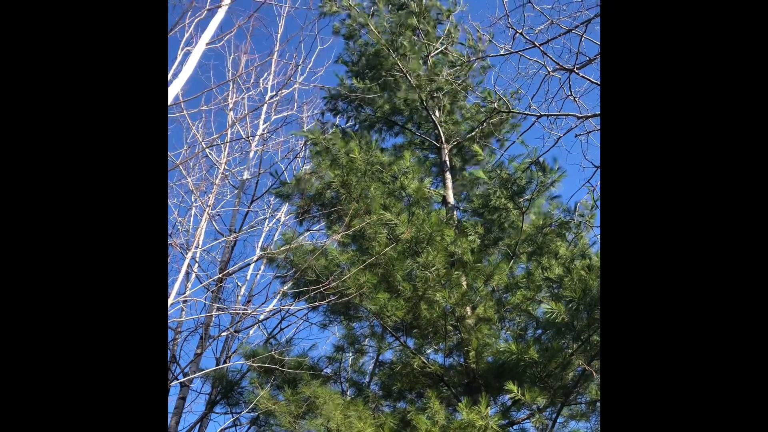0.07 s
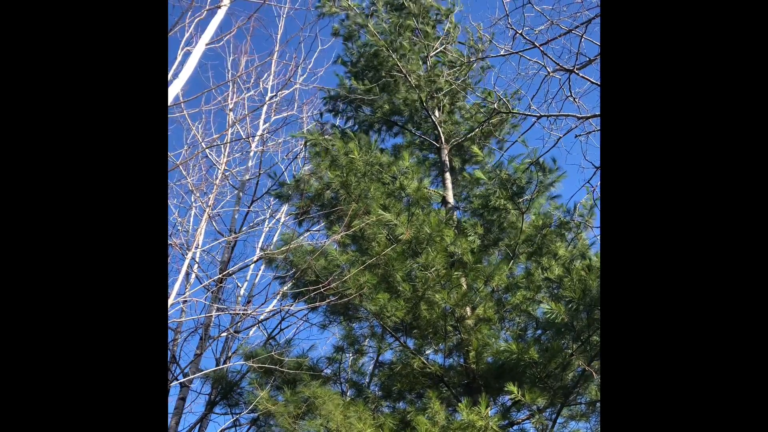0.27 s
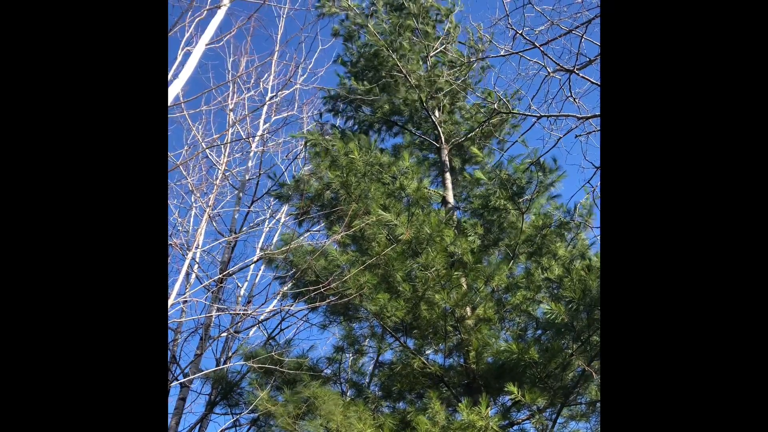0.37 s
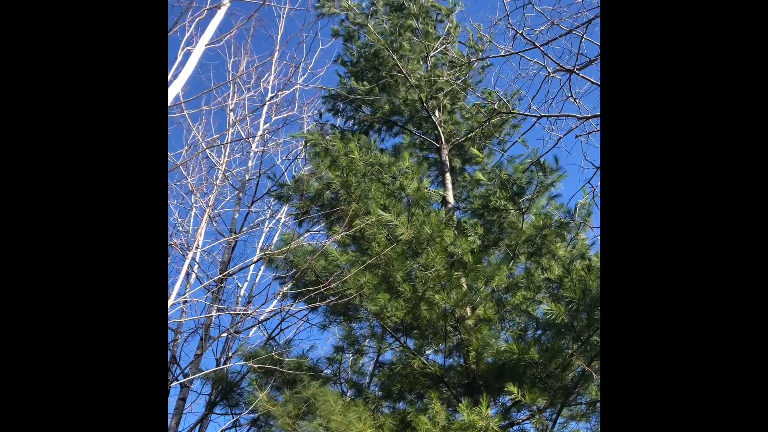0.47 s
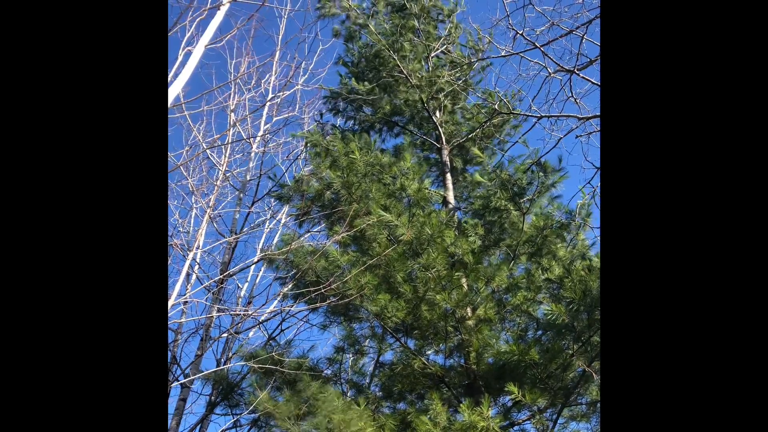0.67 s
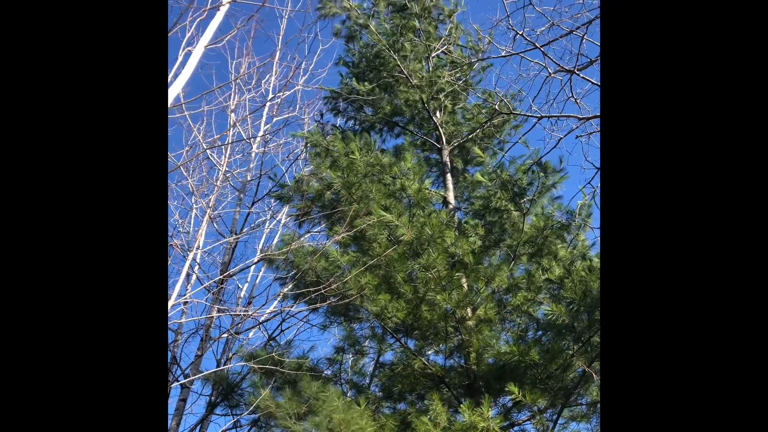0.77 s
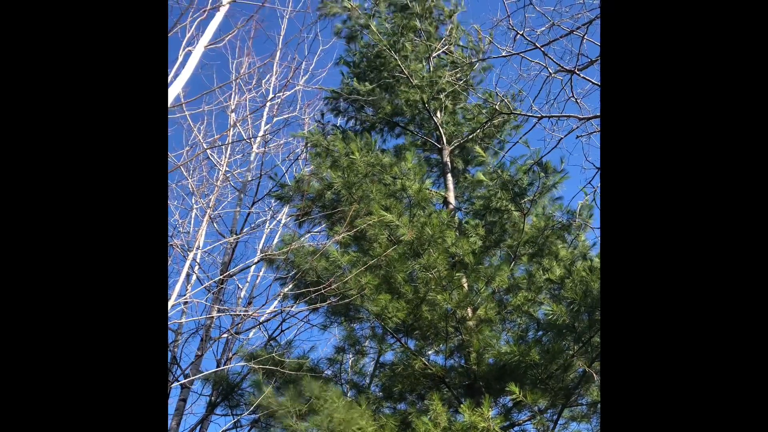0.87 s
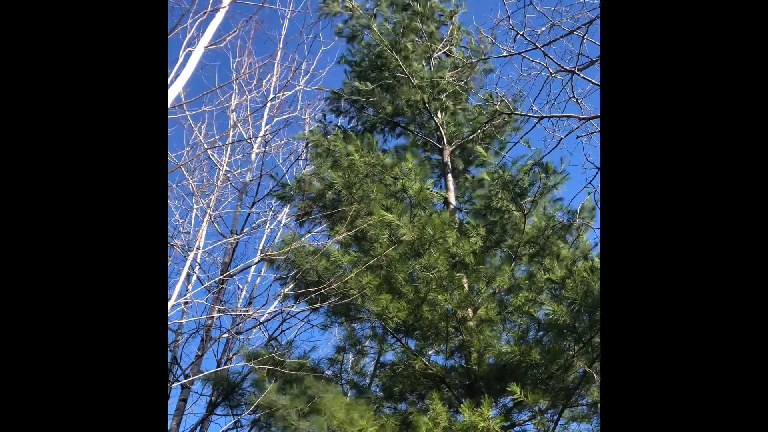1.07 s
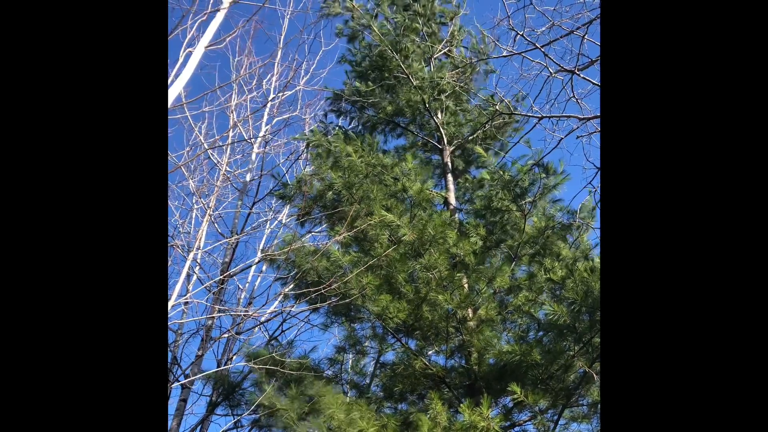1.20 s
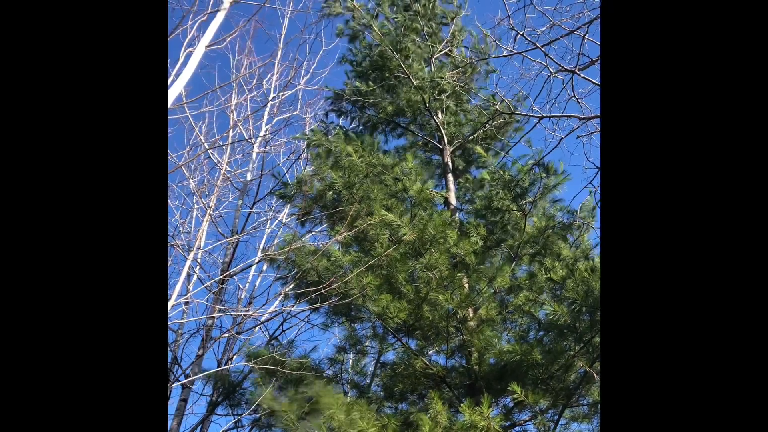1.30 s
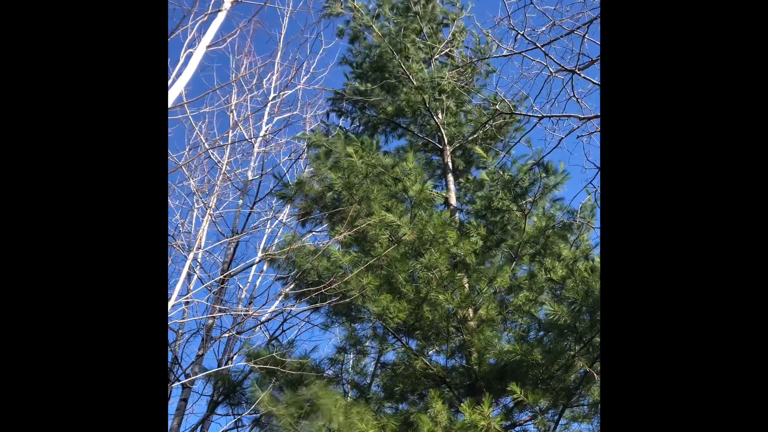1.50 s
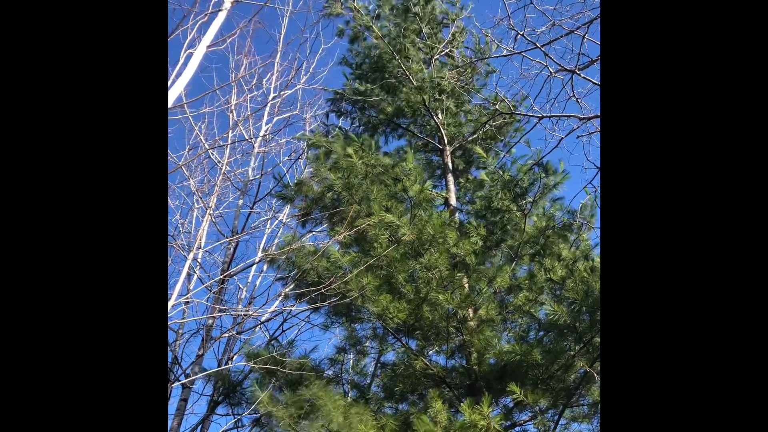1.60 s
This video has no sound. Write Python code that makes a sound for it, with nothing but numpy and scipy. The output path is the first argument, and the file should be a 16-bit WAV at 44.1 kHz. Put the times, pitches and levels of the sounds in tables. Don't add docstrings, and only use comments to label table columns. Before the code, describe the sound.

Blustery wind thumping and rumbling on the microphone, with faint needle hiss and small dry leaf rustles

```python
import sys
import numpy as np
from scipy import signal
from scipy.io import wavfile

SR = 44100
rng = np.random.default_rng(int(sys.argv[2]) if len(sys.argv) > 2 else 0)


def pcm_store(signal):
    levels = np.round(np.clip(np.atleast_2d(signal), -1, 1) * 32767)
    wavfile.write(sys.argv[1], SR, levels.astype(np.int16).T)


def level_to_linear(level):
    exponent = np.asarray(level, float) / 20
    return 10 ** exponent


N = 72765


def rms_one(x):
    return x / np.sqrt(np.mean(x ** 2) + 1e-20)


def at_hz(points, hz):
    point_hz, point_db = np.transpose(points)
    return np.interp(np.log(hz), np.log(point_hz), point_db)


def band(x, low_hz, high_hz):
    edges_hz = [low_hz, min(high_hz, .45 * SR)]
    return signal.sosfilt(signal.butter(2, edges_hz, "band", fs=SR, output="sos"), x)


def drift(rate_hz):
    hop, settle = 40, 2000
    white = rng.standard_normal(N // hop + settle + 2)
    pole = np.exp(-2 * hop * np.pi * rate_hz / SR)
    slow = signal.lfilter([1], [1, -2 * pole, pole * pole], white)[settle:]
    return np.interp(np.arange(N) / hop, np.arange(len(slow)), rms_one(slow))


def bands(spectrum, edges_hz, gain_db):
    white = rng.standard_normal((2, N + SR))
    colour, out = 0, 0
    for k, (low, high) in enumerate(zip(edges_hz, edges_hz[1:])):
        centre_hz = np.sqrt(low * high)
        narrow = band(band(white[k % 2], low, high), low / 1.3, high * 1.3)[SR:]
        part = level_to_linear(at_hz(spectrum, centre_hz)) * narrow
        colour = colour + part
        out = out + part * level_to_linear(gain_db(centre_hz))
    return out / colour.std()


def needles():
    # hz, density_db (dB per Hz)
    needle_spectrum = [(60, -6.5), (200, -14), (420, -9.5), (800, -7), (1200, -13.5), (2200, -20),
                       (6000, -27), (11000, -37)]
    level_db, patch_db = -55, .35
    together = drift(3.7)

    def gain_db(hz):
        return patch_db * (together + drift(4.0))

    half_octaves_hz = 45 * 2 ** np.arange(0, 9.1, .5)
    return level_to_linear(level_db) * bands(needle_spectrum, half_octaves_hz, gain_db)


def rustles():
    # start_s, level_db (rms), centre_hz, length_s
    leaf_puffs = [(0.222, -60.5, 6840, 0.012), (0.231, -66, 7500, 0.024), (0.446, -67.5, 11500, 0.028),
                  (0.458, -68, 3300, 0.019), (0.498, -76, 12400, .03), (.61, -72.5, 9000, .14),
                  (0.67, -74, 12100, 0.077), (0.723, -63, 6000, 0.02), (0.73, -69, 10600, 0.016),
                  (0.793, -74, 11000, 0.0089), (.887, -67.5, 10000, 0.013), (1.058, -72, 13900, .014),
                  (1.078, -74, 14000, .016), (1.25, -66, 13200, .016), (1.278, -54, 14000, 0.0076),
                  (1.279, -59, 4960, 0.0068), (1.28, -60, 7300, 0.0046), (1.289, -63.5, 13600, 0.027),
                  (1.301, -61, 7560, 0.0084), (1.336, -64, 4800, 0.021), (1.379, -66, 13700, 0.043),
                  (1.425, -66.5, 8800, 0.014), (1.469, -72, 14500, 0.0093), (1.355, -73, 14000, .008),
                  (1.277, -63, 9300, 0.0094), (0.216, -68.5, 10500, 0.0071), (1.545, -62.5, 5540, 0.0082)]
    grain_db, stir_db = 3.5, -78
    core_oct, skirt_oct, skirt_db = .25, .9, -11
    t = np.arange(N) / SR
    grainy = rng.standard_normal(N) * level_to_linear(grain_db * drift(100.0))

    def puff_band(hz, half_width_oct):
        return rms_one(band(grainy, hz / 2 ** half_width_oct, hz * 2 ** half_width_oct))

    out = level_to_linear(stir_db) * rms_one(band(grainy, 7000, 18000))
    for start_s, level_db, centre_hz, length_s in leaf_puffs:
        puff = puff_band(centre_hz, core_oct) + level_to_linear(skirt_db) * puff_band(centre_hz, skirt_oct)
        swell = np.sin(np.pi * np.clip((t - start_s) / length_s, 0, 1))
        out += level_to_linear(level_db) * puff * swell
    return out


def twig():
    # pitch_hz, level_db
    twig_modes = [(760, 1), (930, -1), (1250, -8), (1500, -6), (1800, -8), (2100, -8), (2400, -10)]
    start_s, tap_db, t60_s = 1.0135, -44, .026
    t = np.maximum(np.arange(N) / SR - start_s, 0)
    decay_db = tap_db - 60 * t / t60_s
    return sum(level_to_linear(decay_db + level_db) * np.sin(2 * np.pi * hz * t) for hz, level_db in twig_modes)


def rumble():
    # time_s, level_db, tilt_db (dB per octave about 120 Hz)
    gust_course = [(0, -43, -6.5), (.22, -33, 0.5), (0.387, -38, 2), (0.432, -24.5, 4.5), (.475, -34.5, -8),
                   (.6, -36, 6), (0.641, -26.5, 4.5), (.725, -25, 5), (.78, -47.5, -11), (.92, -46, -4.5),
                   (1.0, -53.5, -9), (1.05, -44, -8), (1.11, -64.5, 0), (1.16, -54, 3), (1.189, -36.5, -2),
                   (1.291, -34, -1), (1.37, -51, -7.5), (1.65, -59, 7)]
    # hz, density_db (dB per Hz)
    rumble_spectrum = [(25, -23.5), (50, -0.5), (85, 3), (170, -2.5), (300, -18.5), (500, -24.5),
                       (900, -57.5)]
    lump_db, lumps_hz = 4, 7
    time_s, level_db, tilt_db = np.transpose(gust_course)
    t = np.arange(N) / SR
    lumps = drift(lumps_hz)

    def gain_db(hz):
        wind_db = np.interp(t, time_s, level_db + tilt_db * np.log2(hz / 120))
        return wind_db + lump_db * (0.55 * lumps + 0.23 * drift(lumps_hz))

    half_octaves_hz = 22 * 2 ** np.arange(0, 6.1, .5)
    return bands(rumble_spectrum, half_octaves_hz, gain_db)


def eddies():
    # start_s, peak_db, pitch_hz (on
    # arrival), length_s
    port_eddies = [(.085, -28, 142, 0.034), (.208, -21.5, 169, 0.021), (.293, -35, 287, 0.033),
                   (0.347, -26.5, 207.8, 0.047), (.409, -26.5, 686, 0.014), (0.42, -14.5, 279, 0.0197),
                   (.447, -14.5, 263.3, 0.018), (0.494, -25.5, 218.7, 0.06), (.56, -13, 250, 0.019),
                   (0.594, -23.5, 247, 0.019), (.613, -7, 427, 0.012), (0.643, -19, 406, 0.0075),
                   (0.652, -11.5, 450, 0.0061), (.660, -15.5, 432, 0.015), (0.674, -16, 470, .013),
                   (0.685, -15, 786, 0.01226), (.702, -12.5, 438, 0.0083), (.714, -21, 374, 0.023),
                   (0.745, -27, 348, 0.045), (0.799, -30.5, 284, 0.033), (.845, -34, 226, 0.049),
                   (0.884, -26, 209.4, 0.034), (1.03, -33, 266, 0.042), (1.184, -30.5, 407, 0.017),
                   (1.206, -24.5, 213, 0.014), (1.222, -28, 399, 0.019), (1.255, -20.5, 324.5, 0.023),
                   (1.297, -30.5, 520, 0.011), (1.321, -33.5, 251.5, 0.036), (1.531, -40, 242, 0.032),
                   (0.159, -29.5, 226, 0.036), (0.254, -33, 230, 0.019), (.32, -31.5, 241.5, 0.033),
                   (0.366, -40, 240, .025), (.433, -24, 335, 0.015), (.468, -39, 238, 0.039),
                   (.51, -25.5, 199, 0.045), (.54, -31.5, 221, .02), (.622, -11, 345, 0.0156),
                   (.693, -22.5, 288, 0.0155), (0.766, -31.5, 260, 0.023), (1.171, -31.5, 224, 0.018),
                   (1.258, -26, 564, 0.012), (1.266, -24.5, 163, 0.02), (1.337, -30.5, 197, 0.02),
                   (.443, -30, 710, 0.013), (.638, -28, 760, 0.0089), (.647, -25, 960, 0.011),
                   (.663, -28, 965, .012), (.673, -32, 836, 0.0097), (.716, -27.5, 790, 0.0134),
                   (.726, -28, 616, 0.0106), (.559, -31.5, 607, .01), (1.53, -40, 108, 0.032),
                   (.425, -18.5, 147, 0.026)]
    # pitch_ratio, level_db, length_ratio
    eddy_swirls = [
        (1.687, -11, 0.754),
        (1.033, -1.5, 0.907),
        (0.5254, -11.5, 1.99),
    ]
    end_pitch, slowing = 0.43, 0.41
    early_peak, wobble_oct = .7, .2
    out = np.zeros(N + SR)
    for start_s, peak_db, pitch_hz, length_s in port_eddies:
        start = int(start_s * SR)
        for pitch_ratio, level_db, length_ratio in eddy_swirls:
            samples = length_ratio * length_s * SR
            u = np.arange(int(samples)) / samples
            uneven = np.interp(u, np.linspace(0, 1, 8), rng.standard_normal(8))
            falling = end_pitch + (1 - end_pitch) * np.exp(-u / slowing)
            hz = pitch_ratio * pitch_hz * falling * 2 ** (wobble_oct * uneven)
            turns = np.cumsum(hz) / SR + rng.standard_normal()
            swell = np.sin(np.pi * u ** early_peak) ** 2
            out[start:start + len(u)] += level_to_linear(peak_db + level_db) * np.sin(2 * np.pi * turns) * swell
    return signal.sosfilt(signal.butter(3, 1165, fs=SR, output="sos"), out[:N])


def scene():
    return (needles() + rustles() + twig() + rumble() + eddies())[None]


def top_cut(x):
    return signal.sosfilt(signal.butter(12, 15680, fs=SR, output="sos"), x)


def record(dry):
    x = signal.sosfilt(signal.butter(2, 45, "high", fs=SR, output="sos"), dry)
    x = signal.sosfilt(signal.ellip(10, .2, 70, 15700, fs=SR, output="sos"), x)
    return top_cut(x)


dry = scene()
out = record(dry)
pcm_store(out)
```